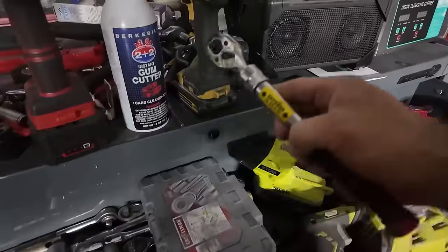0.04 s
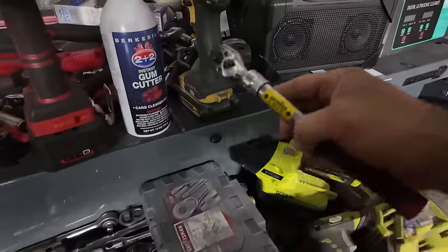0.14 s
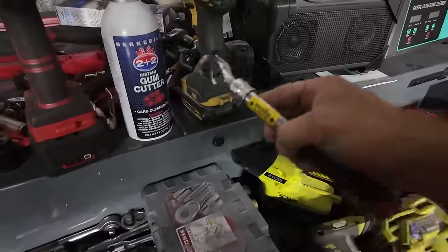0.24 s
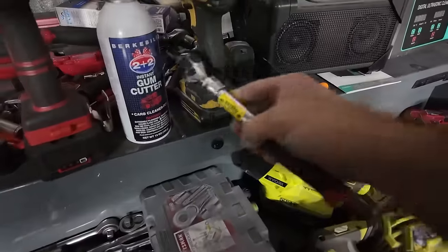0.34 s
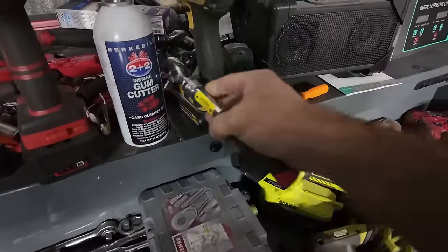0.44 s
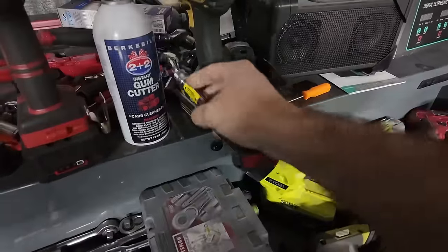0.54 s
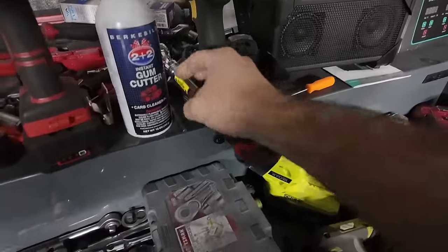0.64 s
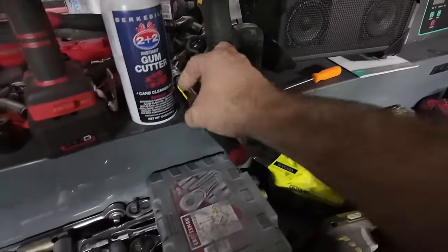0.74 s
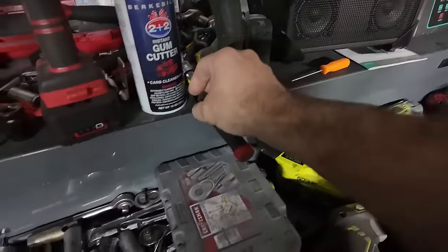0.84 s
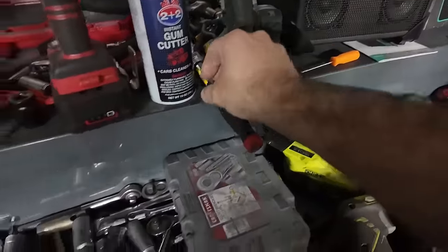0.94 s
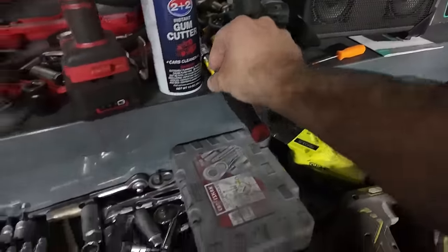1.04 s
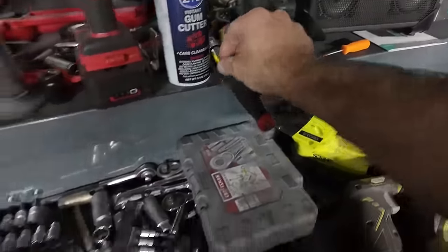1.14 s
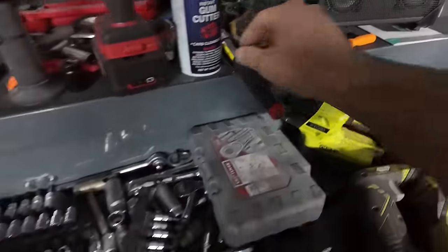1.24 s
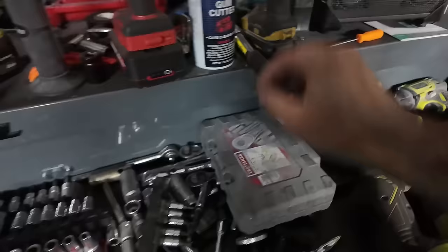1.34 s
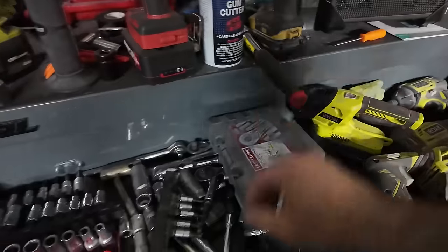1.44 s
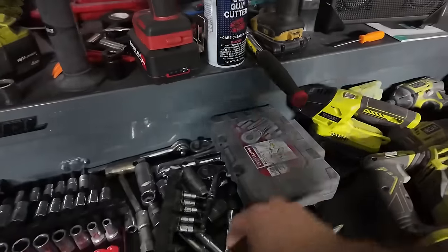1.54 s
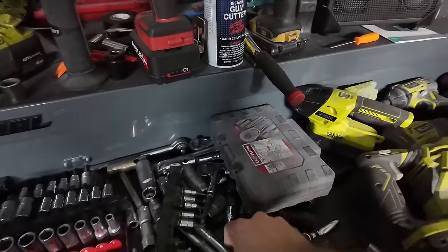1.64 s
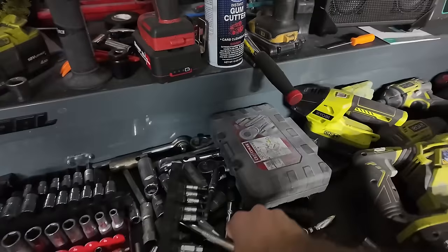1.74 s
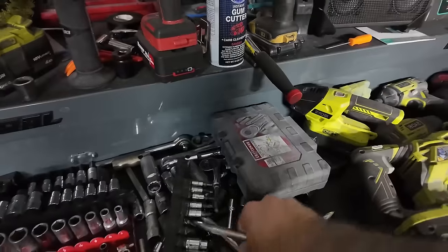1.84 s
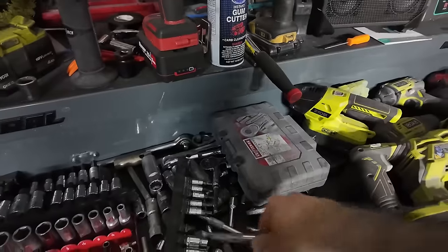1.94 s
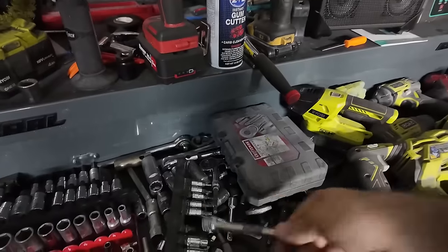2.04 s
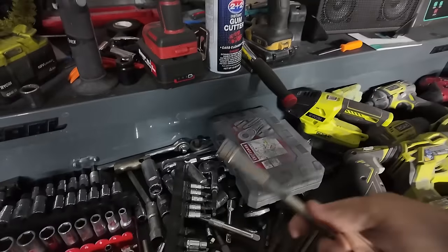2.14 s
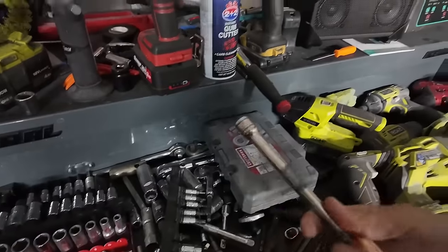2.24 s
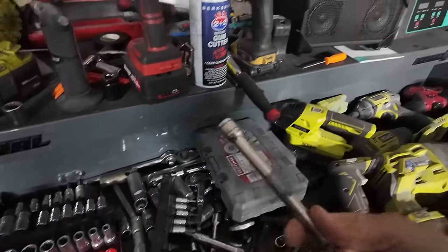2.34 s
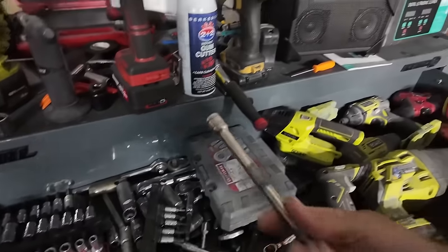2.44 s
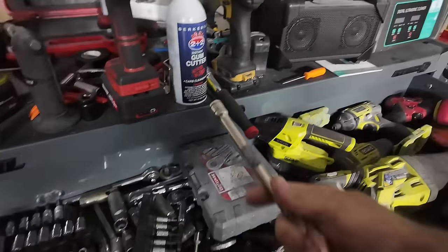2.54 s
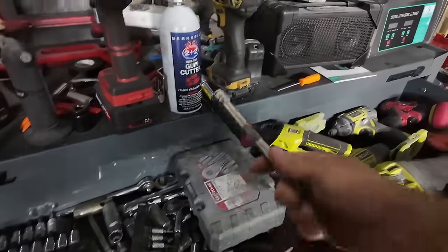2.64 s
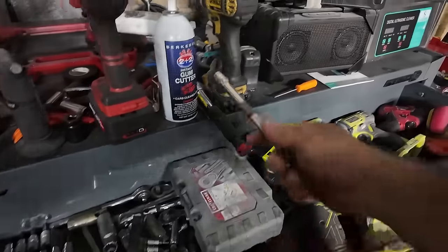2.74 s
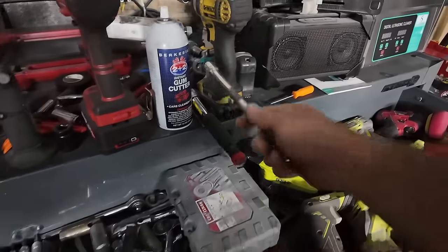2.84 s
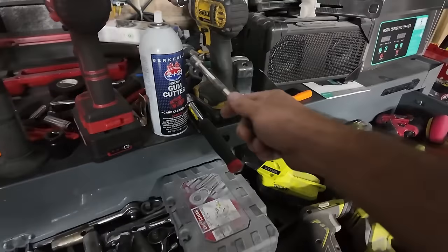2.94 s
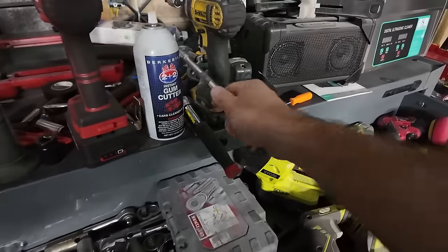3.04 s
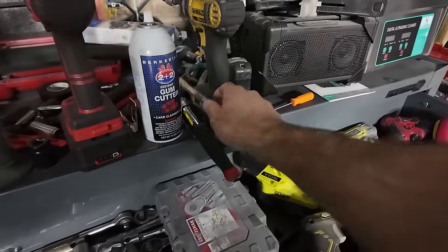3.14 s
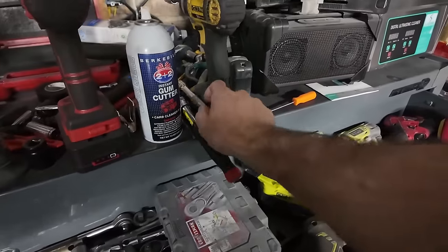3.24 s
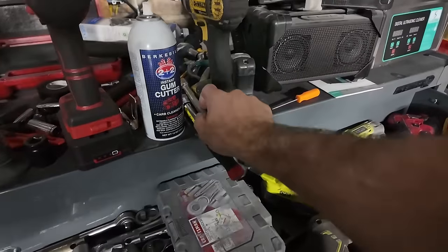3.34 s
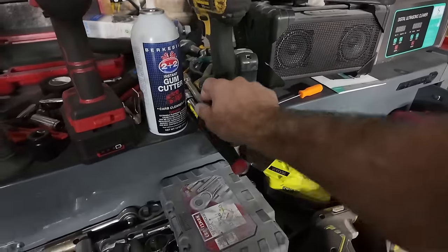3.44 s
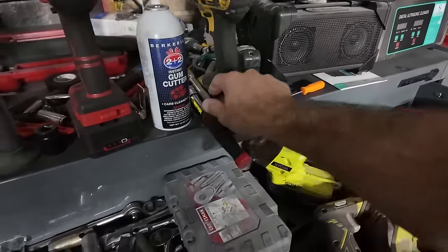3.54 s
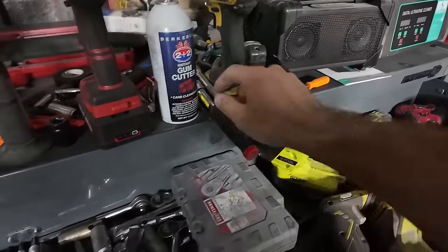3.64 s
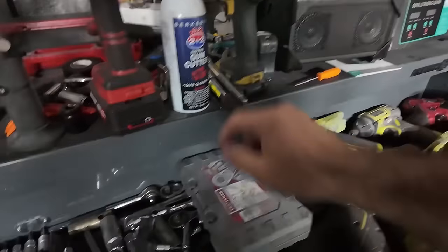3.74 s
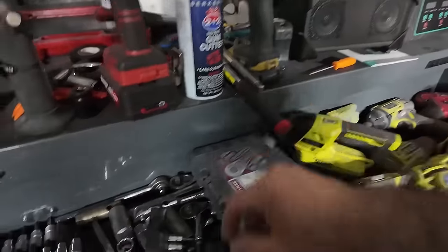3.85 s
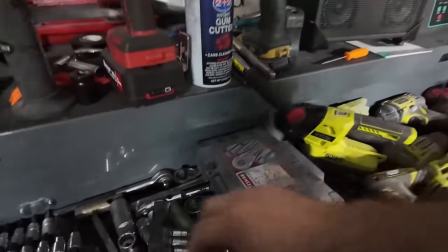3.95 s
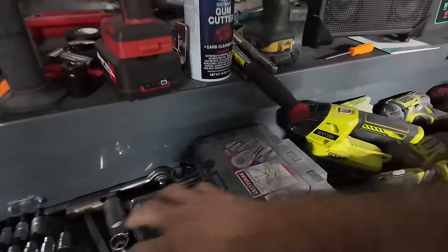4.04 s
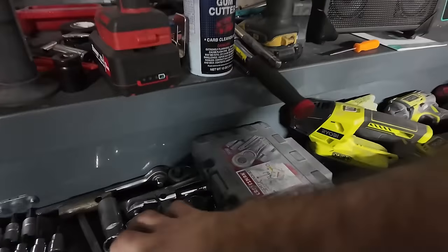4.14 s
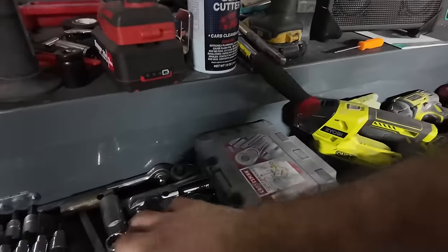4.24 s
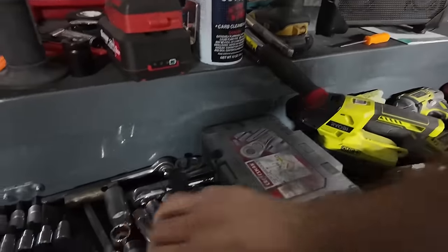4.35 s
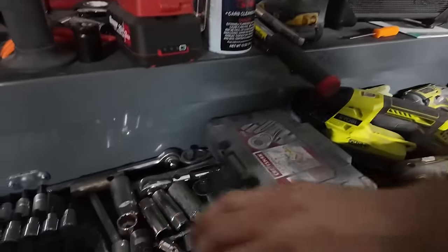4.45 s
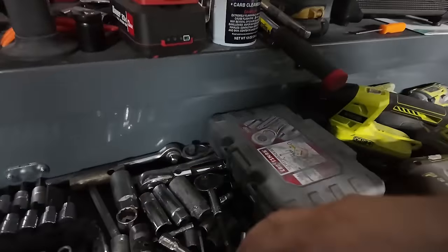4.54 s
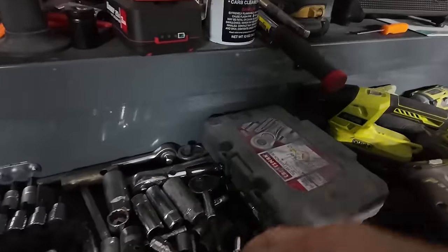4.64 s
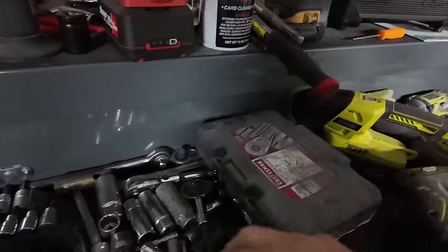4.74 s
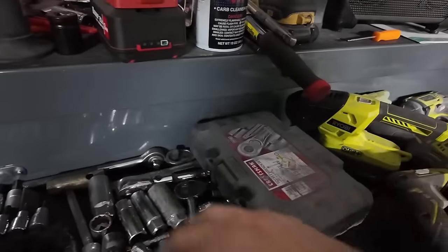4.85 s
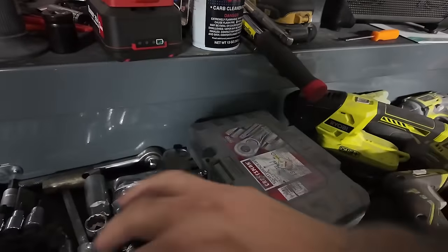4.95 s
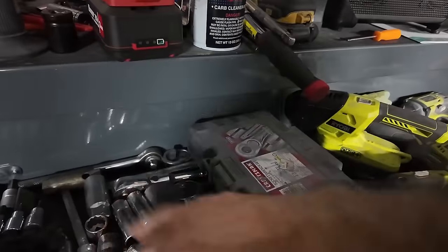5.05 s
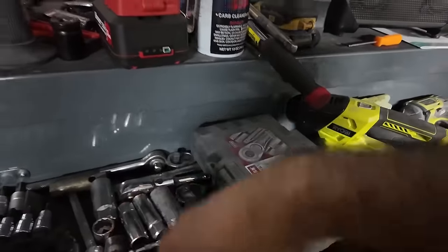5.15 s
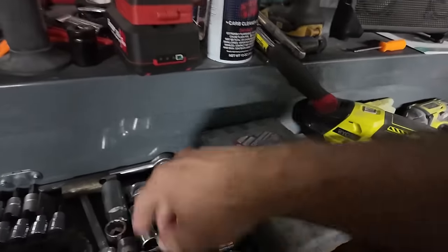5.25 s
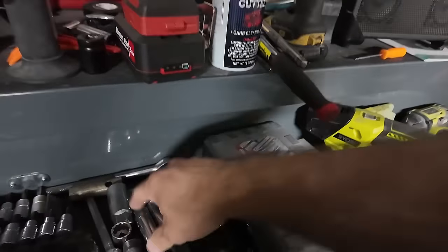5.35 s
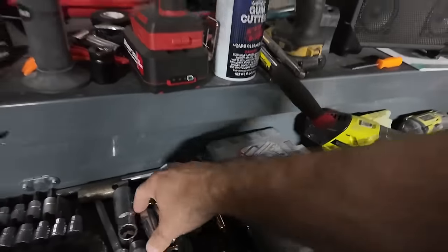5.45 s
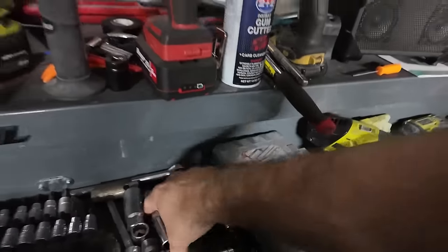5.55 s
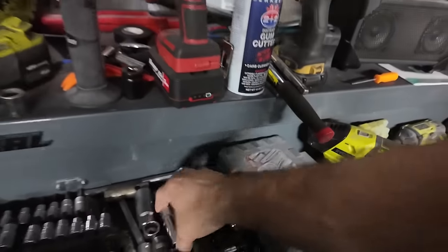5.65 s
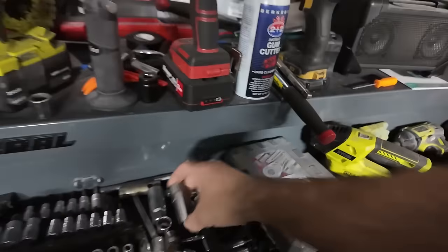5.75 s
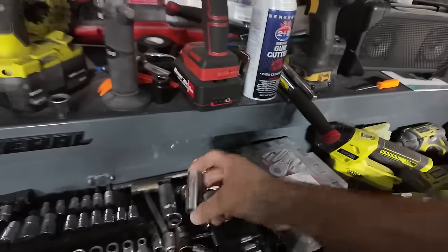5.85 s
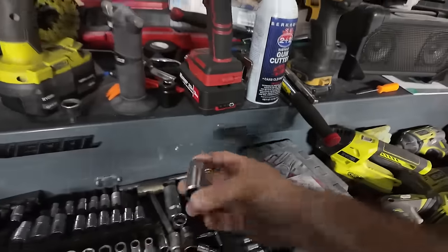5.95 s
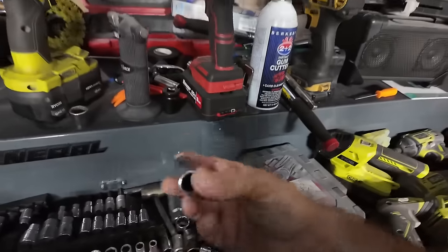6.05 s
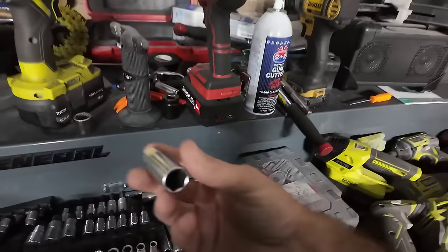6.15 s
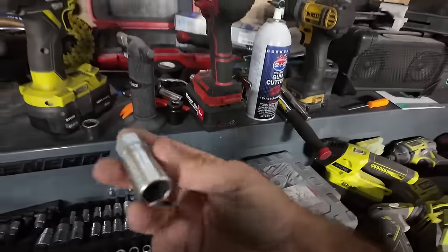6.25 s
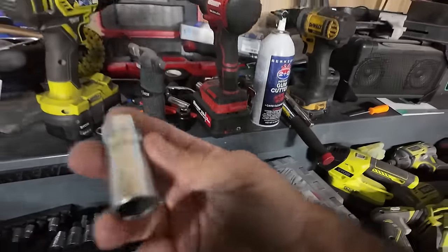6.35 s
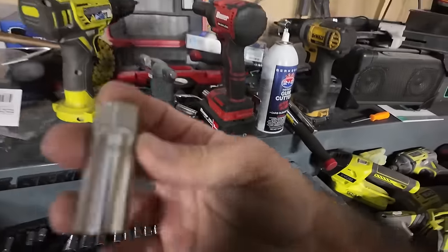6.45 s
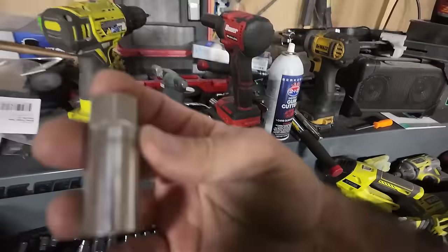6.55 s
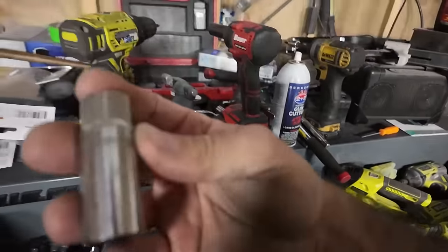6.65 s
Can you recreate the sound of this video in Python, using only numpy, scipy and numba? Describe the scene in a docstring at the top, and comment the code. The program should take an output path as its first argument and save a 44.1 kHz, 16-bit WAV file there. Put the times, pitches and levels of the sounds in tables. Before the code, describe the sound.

A quiet garage, very faint low hum, heard close on a phone. A barely audible sleeve rustle at about 0.5 s leads to a tool laid on a steel shelf at 0.73 s: a hard clack with a hollow low boom, small follow-up taps until 0.95 s. Near silence until 1.65 s, when light steel ticks begin; at 1.9 s an extension bar knocks sockets with a bright, high ring, ending with a short clink at 2.04 s. Quiet again. At 3.18 s the bar lands on the shelf, a strong boomy double clank, with tiny taps to 3.5 s. From 4.15 s sockets are rummaged: light rattling, a dull plastic-case knock at 4.54 s, dense sharp clatter around 4.7 s, the loudest ringing clack at 5.09 s, then scattered clinks fading by 5.7 s. A tiny tick at 5.9 s, then only hum until 6.7 s.

```python
"""A quiet garage hums, a sleeve rustles faintly, then a hand lays tools on a steel shelf and
rummages through sockets in a tool chest drawer, close to a phone.
Hum, cloth, clacks and loose parts use shaped noise; the parts also make short pitched clinks.
The shelf, plastic case, drawer panels, extension bar and two sockets are sets of decaying tones.
A short echo surrounds the near sounds."""
import sys
import numpy as np
from scipy import signal
from scipy.fft import rfft, irfft
from scipy.io import wavfile
from scipy.ndimage import uniform_filter1d
from numba import njit

SR = 44100
rng = np.random.default_rng(int(sys.argv[2]) if len(sys.argv) > 2 else 0)


def wav_out(sig):
    """Save sig, one row per channel (or a flat mono array), as 16-bit PCM at SR to the path in sys.argv[1]."""
    wavfile.write(sys.argv[1], SR, np.round(np.clip(np.atleast_2d(sig).T, -1, 1) * 32767).astype(np.int16))


N = 295470

# Colour of the garage hum and hiss: f/Hz, relative level per Hz/dB
HUM_SPECTRUM = [(18, -59), (30, -31.5), (52, -5.5), (100, 0), (117, -2.5), (156, -22.5), (237, -23.5),
                (970, -32.5), (1590, -34), (2240, -35), (3400, -36), (6540, -41), (15500, -46)]
HUM_DB = -65  # rms of the mean of both channels
# The arm reaches for the shelf and the sleeve rustles: t/s, held/s, level/dB
REACHES = [(0.528, 0.18, -73.5), (3.0, .17, -79.5)]
REACH_RISE_DB_S, REACH_FALL_DB_S = 200, 295
# Bands of the cloth hiss: low f/Hz, high f/Hz, relative level/dB
CLOTH_BANDS = [(250, 450, 2), (5900, 6600, -2), (8300, 11500, 0)]

# Knocks on shelf and drawer: t/s, shelf boom level/dB, boom f/Hz, case and panel level/dB
KNOCKS = [(0.725, -13, 126, -16), (0.784, -21, 257, -23), (0.933, -25.5, 141, -59.5),
          (0.947, -25, 125.6, -37.5), (1.159, -41, 203, -49), (1.887, -25.5, 312, -28),
          (2.033, -59, 314, -39), (3.177, -21, 207, -21.5), (3.186, -17, 147.4, -17.5),
          (3.291, -45, 177, -38), (3.487, -40.5, 194.5, -47.5), (4.152, -31, 272.7, -30.5),
          (4.209, -41, 93, -47.5), (4.246, -39.5, 322, -33), (4.297, -34.5, 290, -35),
          (4.537, -38.5, 270, -12), (4.548, -43.5, 298, -13.5), (4.591, -34.5, 94, -57),
          (4.616, -59.5, 215, -21.5), (4.654, -48, 263, -24.5), (4.705, -24.5, 280, -25),
          (4.728, -48, 263, -21.5), (4.791, -36.5, 296, -26), (5.083, -24, 154.3, -26),
          (5.094, -18.5, 270.5, -37), (5.129, -48, 280, -29), (5.291, -39.5, 96, -33.5),
          (5.455, -50, 179, -51), (5.605, -42, 244, -62), (5.907, -74, 142.4, -58.5)]
# Tones of the plastic case and drawer panels: f/Hz, relative level/dB, time to fall 60 dB/s
PANEL_MODES = [(352, -11, 0.13), (414, -0.5, 0.049), (514, -5, 0.069), (631, -4.5, 0.046),
               (881, -3.5, 0.042), (1095, -10.5, 0.053), (1178, -2.5, 0.033), (1660, -9.5, 0.055)]
PANEL_SCATTER_DB, PANEL_DETUNE = 2.5, 0.03  # random spread of level and of pitch (fraction)

# Loose parts are stirred: t/s, held/s, rattle level/dB, treble level/dB, drawer rumble level/dB
STIRS = [(0.738, 0.0067, -37.5, -49, -25), (.95, 0.01, -77, -70, -48), (1.13, 0.025, -71, -76.5, -57.5),
         (1.67, 0.033, -60, -63.5, -55.5), (1.72, 0.15, -53.5, -49.5, -59.5),
         (1.898, 0.12, -46, -43, -51.5), (3.188, 0.011, -37.5, -67, -31.5), (3.489, 0.023, -73, -90, -59.5),
         (4.168, 0.11, -43, -57.5, -48.5), (4.278, 0.046, -42.5, -44.5, -52.5),
         (4.42, 0.013, -51.5, -59, -53.5), (4.558, 0.074, -48.5, -55.5, -48.5),
         (4.66, 0.046, -38, -42.5, -41.5), (4.728, 0.01, -26.5, -27, -31.5),
         (5.089, 0.013, -28, -21.5, -36.5), (5.188, 0.085, -42, -43, -43.5), (5.39, 0.023, -47, -57, -45),
         (5.488, 0.0067, -37.5, -47, -45), (5.602, 0.091, -56.5, -84, -54.5)]
STIR_RISE_DB_S, SETTLE_DB_S, RUMBLE_SETTLE_DB_S = 1497.5, 189.5, 149.5
# Clinks: CLINK_DB is relative to the rattle swell, CLINK_HZ is the middle pitch
CLINKS_PER_S, CLINK_DB, CLINK_SCATTER_DB = 200, 6, 3.5
CLINK_HZ, CLINK_OCTAVES, CLINK_T60_S = 3100, 0.7, 0.022

# The extension bar is struck: t/s, low modes level/dB, middle modes level/dB, high modes level/dB
BAR_HITS = [(1.6586, -63.5, -37.5, -40), (1.7034, -46, -17, -22), (1.8868, -38.5, -5.5, -12.5),
            (1.8956, -44, -6.5, -23), (1.9325, -25.5, -17, -29), (1.9564, -103.5, -18, -26),
            (1.9744, -29.5, -22.5, -20.5), (2.0396, -42, -28, -30.5), (3.1778, -17.5, -15.5, -19),
            (3.3004, -43.5, -35.5, -45), (3.4869, -54.5, -48, -68.5), (4.1726, -44, -40, -48),
            (4.2428, -30, -20.5, -42.5), (4.2986, -52, -61.5, -35.5), (4.4263, -56, -37, -54),
            (5.0847, -27, -11, -21.5), (5.1505, -54, -34, -39), (5.2244, -36, -22.5, -37),
            (5.3054, -62, -32, -43), (5.4744, -35, -39, -36), (5.5134, -28, -29, -48)]
# Tones of the extension bar, two low, three middle, two high: f/Hz
BAR_HZ = [2384, 2420, 6560, 6530, 6480, 12348, 12240]
# Strength of each bar tone: relative level/dB
BAR_DB = [-3, 1, -1.5, -11, -0.5, 1, -3]
# Ringing of each bar tone: time to fall 60 dB/s
BAR_T60_S = [0.082, 0.15, 0.13, .4, .05, 0.21, .1]
# A socket is struck: t/s, which socket, level/dB
SOCKET_HITS = [(1.7464, "deep", -55), (1.8988, "deep", -19), (1.9324, "deep", -15), (1.9175, "small", -46),
               (1.9759, "small", -42), (2.0515, "deep", -45), (4.1754, "small", -47), (4.2482, "deep", -46),
               (5.0895, "deep", -25), (5.0908, "small", -56), (5.1052, "deep", -38), (5.1437, "deep", -38),
               (5.2907, "deep", -28), (5.3046, "deep", -34.5), (5.3941, "small", -52),
               (5.463, "deep", -44.5), (5.508, "deep", -33.5), (5.604, "small", -34), (5.611, "deep", -35),
               (5.692, "small", -25.5), (5.7033, "small", -23.5), (5.91, "deep", -69)]
# Tones of the deep socket: f/Hz
DEEP_HZ = [9712, 9750, 10932]
# Strength of each deep socket tone: relative level/dB
DEEP_DB = [3.5, -12, -16.5]
# Tone of the small socket: f/Hz
SMALL_HZ = [14864]
# Strength of the small socket tone: relative level/dB
SMALL_DB = [3.5]
DEEP_T60_S, SMALL_T60_S = 0.14, 0.27
# Single extra tones of the deep socket and other parts: t/s, level/dB, f/Hz, time to fall 60 dB/s
EXTRA_TONES = [(1.657, -40.5, 10920, 0.12), (1.657, -34, 13700, 0.086), (0.944, -62.5, 1080, 0.47),
               (2.04, -5, 6700, 0.014), (3.488, -57, 1192, 0.12), (4.577, -34.5, 441, 0.57),
               (4.73, -28, 1088, .35), (4.74, -34.5, 1165, 0.35), (5.085, -10, 5730, 0.051),
               (5.104, -25, 5725, 0.33), (5.605, -32, 408, 0.092), (5.69, -20.5, 3753, 0.023),
               (5.908, -54, 940, 0.086)]

# Steel on steel: t/s, level/dB, colour f/Hz, treble level/dB
CLACKS = [(0.652, -43.5, 3530, -57), (0.7278, -16.5, 4860, -15), (0.7454, -51, 1800, -33),
          (0.786, -26, 4540, -36), (0.7978, -32, 3800, -24), (0.8638, -38, 4000, -81),
          (0.9345, -37, 3040, -32), (0.938, -31, 3940, -93), (1.656, -59, 6000, -37),
          (1.694, -34, 6400, -21), (1.704, -31, 6200, -25.5), (1.735, -31.5, 4200, -27),
          (1.8851, -32.5, 2740, -17), (2.0086, -58, 2530, -22), (2.0358, -44, 2600, -58),
          (3.1743, -20.5, 2510, -16), (3.191, -20.5, 2470, -7.5), (3.3595, -55.5, 3730, -72),
          (3.369, -39, 3750, -69), (3.3886, -42.5, 4000, -74), (3.4914, -46.5, 3520, -72),
          (4.145, -45.5, 3640, -46.5), (4.1682, -42, 2460, -39.5), (4.1969, -32.5, 4230, -50),
          (4.209, -43, 2250, -60), (4.233, -27, 1690, -34.5), (4.2439, -24.5, 2504, -29),
          (4.2625, -28, 5330, -22), (4.2989, -38, 1810, -28), (4.321, -37, 2120, -26.5),
          (4.3338, -31, 3430, -27.5), (4.363, -36.5, 3720, -39.5), (4.5281, -34.5, 1520, -58),
          (4.5391, -23.5, 1800, -42), (4.6353, -24.5, 3150, -31), (4.6524, -31.5, 3200, -55),
          (4.695, -30.5, 3500, -22.5), (4.7074, -18.5, 3930, -18.5), (4.726, -16.5, 2640, -15),
          (4.736, -23.5, 4040, -15), (4.758, -29.5, 5270, -29.5), (4.7698, -34, 2500, -43),
          (4.7905, -25.5, 2510, -46.5), (4.8107, -38, 4580, -31.5), (4.8364, -44.5, 5130, -36),
          (4.8509, -32.5, 4000, -36.5), (5.0824, -14, 3790, -17.5), (5.0876, -32.5, 5770, -15.5),
          (5.1016, -16.5, 5240, -23.5), (5.142, -26.5, 5770, -58), (5.1864, -22, 5900, -22),
          (5.2012, -27, 2560, -24), (5.2098, -25, 4760, -22.5), (5.2227, -30.5, 2150, -35),
          (5.2928, -26, 2000, -20.5), (5.305, -52, 4740, -21.5), (5.3824, -33.5, 3930, -57),
          (5.3975, -37, 3300, -54.5), (5.455, -34.5, 1510, -58), (5.4722, -29.5, 2840, -45),
          (5.489, -42, 2370, -32), (5.5049, -23, 3570, -36), (5.517, -37, 2570, -18.5),
          (5.5887, -39, 3440, -52), (5.605, -27.5, 3040, -35), (5.6147, -26, 3600, -41),
          (5.622, -40, 3720, -49), (5.6438, -34.5, 1870, -49), (5.669, -33.5, 3910, -34),
          (5.69, -25, 3640, -22.5), (5.9069, -58.5, 3025, -76)]
CLACK_T60_S, CHATTER_DB = 0.031, 3.5
CRACK_SHARE = 1.05  # gain of the broad crack beside the metallic colour
COLOUR_WIDTH = 1.12  # the colour band runs from f / width to f * width

ROOM_T60_S, ROOM_DB = 0.27, -15.5
TOP_HZ = 16300  # upper limit of the sound


def undb(db):
    """Turn decibels into gain."""
    return 10 ** (np.asarray(db) / 20)


def band(x, lo_hz, hi_hz):
    """Keep a band with gentle edges, scaled so that white noise roughly keeps its rms."""
    sos = signal.butter(2, [lo_hz, min(hi_hz, 0.45 * SR)], "band", fs=SR, output="sos")
    return signal.sosfilt(sos, x) * np.sqrt(SR / 2 / (hi_hz - lo_hz))


def fade(t60, count):
    """Exponential decay that falls 60 dB in t60 seconds."""
    return np.exp(-np.log(1000) * np.arange(count) / (max(t60, 0.004) * SR))


def stereo_noise(count, side_db, alike_hz):
    """Noise that is nearly the same at both phone ports in the bass and partly unlike above."""
    mid, side = rng.standard_normal((2, count))
    highpass = signal.butter(1, alike_hz, "high", fs=SR, output="sos")
    side = signal.sosfilt(highpass, side) * undb(side_db)
    return np.array([mid + side, mid - side])


def swell(s, held_s, db, rise_db_s, fall_db_s):
    """Gain that rises to its level at s, holds and dies away; rows add up in power."""
    t = np.arange(0, N / SR + 0.002, 0.001)[:, None]
    before = np.maximum(s - t, 0)
    after = np.maximum(t - s - np.abs(held_s), 0)
    level = db - rise_db_s * before - fall_db_s * after
    gain = np.sqrt(np.sum(undb(level) ** 2, axis=1))
    return np.interp(np.arange(N) / SR, t[:, 0], gain)


@njit
def add(out, start, hz, t60, rise_s, left, right):
    """Add one decaying tone that builds up during contact; each port has its own complex gain."""
    z = 1 + 0j
    turn_and_decay = np.exp((2j * np.pi * hz - np.log(1000) / t60) / SR)
    wait, wait_decay = 1., np.exp(-1 / (rise_s * SR))
    for i in range(start, min(out.shape[1], start + int(1.3 * t60 * SR))):
        out[0, i] += (1 - wait) * (left * z).imag
        out[1, i] += (1 - wait) * (right * z).imag
        z *= turn_and_decay
        wait *= wait_decay


def strike(s, hz, db, t60, rise_s, scatter_db, detune, ports_rad):
    """Settings for the tones of one blow; strength, pitch and phase between the ports vary."""
    scatter = rng.standard_normal((len(hz), 3))
    for f, d, t, (a, b, c) in zip(hz, db, t60, scatter):
        gain = undb(d + scatter_db * a)
        turn = np.exp(0.5j * ports_rad * (1 + 0.14 * c))
        pitch = f * (1 + detune * b)
        yield int(s * SR), pitch, max(t, 0.01), max(rise_s, 1e-4), gain * turn, gain / turn


def hum():
    """Low machine hum and hiss of the garage: noise given a fixed spectrum."""
    f = np.maximum(np.fft.rfftfreq(N, 1 / SR), 1)
    hz, db = np.transpose(HUM_SPECTRUM)
    shape = undb(np.interp(np.log(f), np.log(hz), db))
    x = irfft(rfft(stereo_noise(N, -3.8, 310)) * shape, N)
    return x * undb(HUM_DB) / np.sqrt(np.mean(x.mean(axis=0) ** 2))


def sleeve():
    """Soft cloth hiss: a low brush, a narrow and a broad treble band."""
    cloth = stereo_noise(N, -8.5, 500)
    hiss = sum(undb(db) * band(cloth, lo_hz, hi_hz) for lo_hz, hi_hz, db in CLOTH_BANDS)
    return hiss * swell(*np.transpose(REACHES), REACH_RISE_DB_S, REACH_FALL_DB_S)


def knocks():
    """The shelf booms for some twenty cycles; case and panels knock with a slightly new colour."""
    out = np.zeros((2, N))
    hz, db, t60 = np.transpose(PANEL_MODES)
    for s, boom_db, boom_hz, panel_db in KNOCKS:
        boom = strike(s, [boom_hz, 1.5 * boom_hz], [boom_db, boom_db + 0.77],
                      [19 / boom_hz, 7 / boom_hz], rise_s=0.0016, scatter_db=0, detune=0,
                      ports_rad=0.044)
        panels = strike(s, hz, db + panel_db, t60, rise_s=0.0022, scatter_db=PANEL_SCATTER_DB,
                        detune=PANEL_DETUNE, ports_rad=0.4)
        for mode in (*boom, *panels):
            add(out, *mode)
    return out


def clinks(stirred):
    """Small parts touch by chance, each with a short pitch, louder when the pile is stirred."""
    out = np.zeros((2, N))
    count = int(CLINKS_PER_S * N / SR)
    starts = (rng.random(count) * N).astype(int)
    pitch, size = rng.standard_normal((2, count))
    pitches_hz = np.minimum(CLINK_HZ * 2 ** (CLINK_OCTAVES * pitch), 0.3 * SR)
    gains = undb(CLINK_DB + CLINK_SCATTER_DB * size) * stirred[starts]
    for i, hz, gain in zip(starts, pitches_hz, gains):
        add(out, i, hz, CLINK_T60_S, 5e-4, gain * np.exp(0.6j), gain * np.exp(-0.6j))
    return out


def rattle():
    """Dense tiny contacts of uneven size jingle among the sockets; the drawer floor rumbles."""
    s, held_s, mid_db, top_db, low_db = np.transpose(STIRS)
    mid = swell(s, held_s, mid_db, STIR_RISE_DB_S, SETTLE_DB_S)
    top = swell(s, held_s, top_db, STIR_RISE_DB_S, SETTLE_DB_S)
    low = swell(s, held_s, low_db, STIR_RISE_DB_S, RUMBLE_SETTLE_DB_S)
    # about 500 contacts a second, over a constant floor
    contacts = (rng.random(N) < 500 / SR) * undb(2.0 * rng.exponential(size=N))
    grain = np.convolve(contacts, fade(0.015, 800))[:N] + 0.27
    grain = grain / np.sqrt(np.mean(grain ** 2)) * stereo_noise(N, -2.0, 500)
    steel = mid * band(grain, 1200, 4800) + top * band(grain, 9000, 12000)
    rumble = low * band(stereo_noise(N, -14.5, 300), 37, 440)
    return steel + clinks(mid) + rumble


def rings():
    """Bar, sockets and single extra tones ring; a random flutter stands for touching neighbours."""
    out = np.zeros((2, N))
    blows = []
    for s, *group_db in BAR_HITS:
        mode_db = np.add(BAR_DB, np.repeat(group_db, repeats=[2, 3, 2]))
        blows.append((s, BAR_HZ, mode_db, BAR_T60_S))
    sockets = {"deep": (DEEP_HZ, DEEP_DB, DEEP_T60_S), "small": (SMALL_HZ, SMALL_DB, SMALL_T60_S)}
    for s, which, db in SOCKET_HITS:
        hz, mode_db, t60 = sockets[which]
        blows.append((s, hz, np.add(mode_db, db), [t60] * len(hz)))
    for s, db, hz, t60 in EXTRA_TONES:
        blows.append((s, [hz], [db], [t60]))
    for blow in blows:
        for mode in strike(*blow, rise_s=0.00078, scatter_db=1.2, detune=0.0012, ports_rad=1.3):
            add(out, *mode)
    flutter = uniform_filter1d(uniform_filter1d(rng.standard_normal(N), size=250), size=250)
    return out * undb(2.2 * flutter / flutter.std())


def clacks():
    """Steel chatters on steel: a damped metallic colour, a broad crack and a treble tick."""
    out, size = np.zeros((2, N)), 6000
    onset = 1 - np.exp(-np.arange(size) / (0.0019 * SR))
    for s, db, hz, top_db in CLACKS:
        # the level jumps at random every 50 samples
        chatter = undb(CHATTER_DB * np.repeat(rng.standard_normal(size // 50), 50))
        burst = stereo_noise(size, -4.5, 500) * chatter * onset * fade(CLACK_T60_S, size)
        colour = band(burst, hz / COLOUR_WIDTH, hz * COLOUR_WIDTH)
        body = colour + CRACK_SHARE * band(burst, 1200, 6000)
        tick = band(burst, 3500, 14000)
        i = int(s * SR)
        out[:, i:i + size] += undb(db) * body + undb(top_db) * tick
    return out


def scene():
    """Close sources, their short echo from chest and garage, and the hum."""
    near = sleeve() + knocks() + rattle() + rings() + clacks()
    size = 20000
    echo = band(stereo_noise(size, -4.5, 300), 130, 8400) * fade(ROOM_T60_S, size)
    echo[:, :150] = 0  # first reflection after about a metre
    echo = echo / np.sqrt(np.sum(echo ** 2) / 2)
    wet = signal.fftconvolve(near.mean(axis=0, keepdims=True), echo, axes=1)[:, :N]
    return near + undb(ROOM_DB) * wet + hum()


def record(dry):
    """Deep bass and highest treble are thinned, loudest peaks rounded and the top cut."""
    thin = signal.sosfilt(signal.butter(2, [50, 15000], "band", fs=SR, output="sos"), dry)
    rounded = np.tanh(0.92 * thin) / 0.77
    return signal.sosfilt(signal.ellip(10, 0.2, 90, TOP_HZ, fs=SR, output="sos"), rounded)


dry = scene()
out = record(dry)
wav_out(out)
```